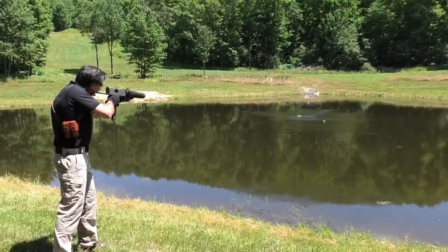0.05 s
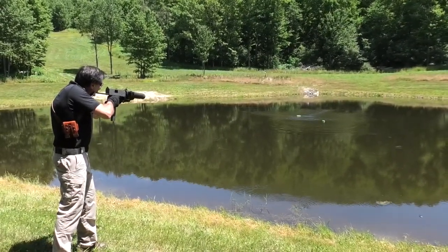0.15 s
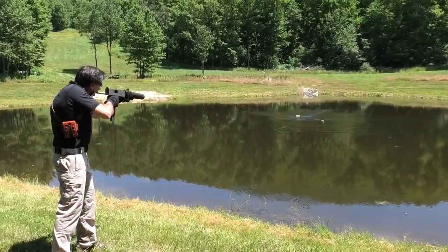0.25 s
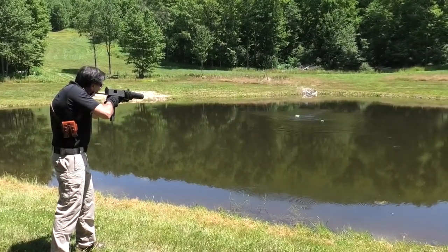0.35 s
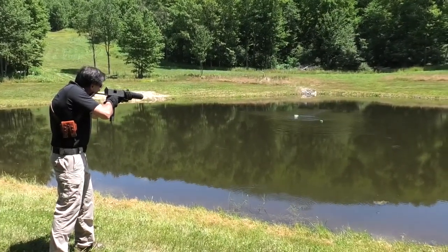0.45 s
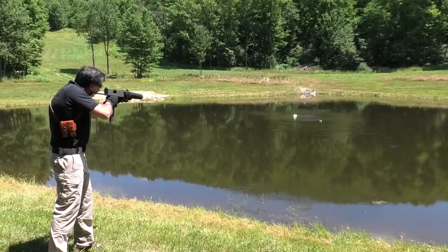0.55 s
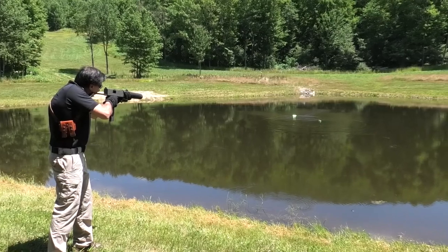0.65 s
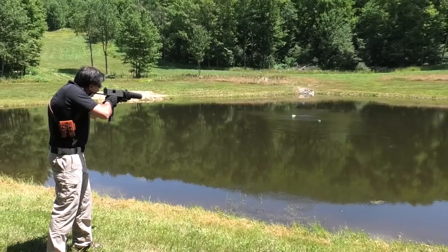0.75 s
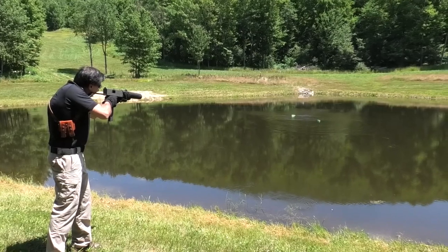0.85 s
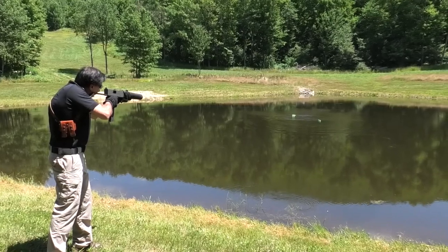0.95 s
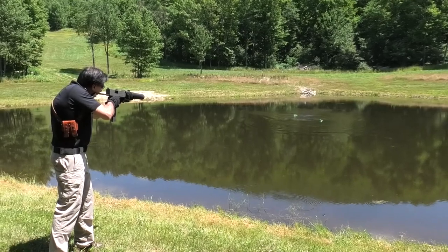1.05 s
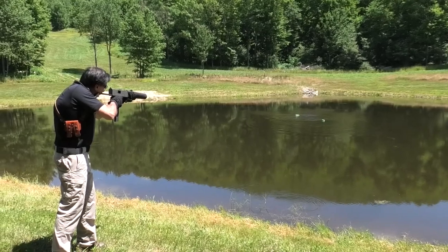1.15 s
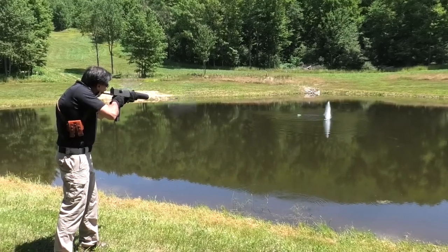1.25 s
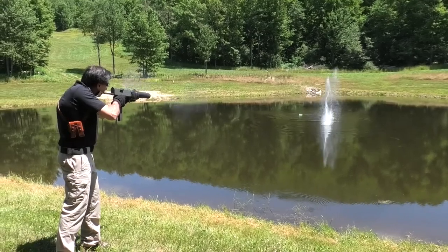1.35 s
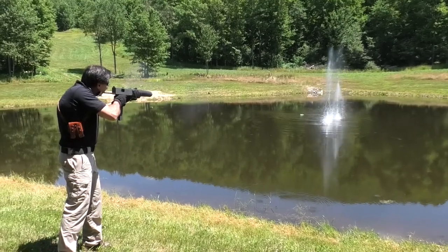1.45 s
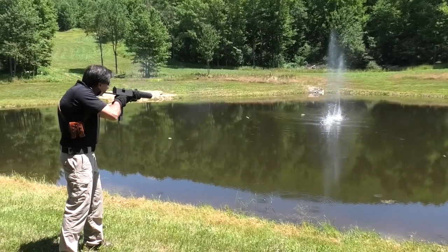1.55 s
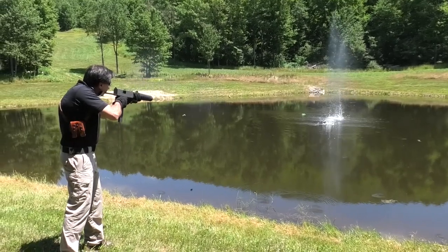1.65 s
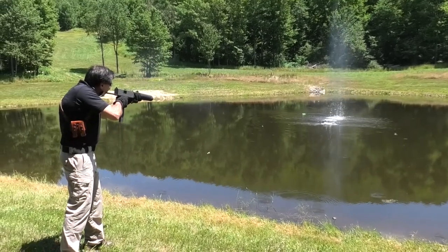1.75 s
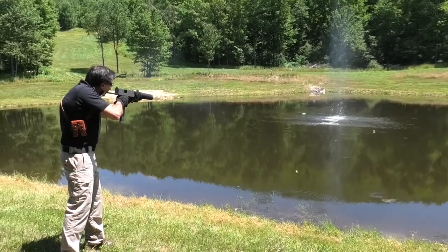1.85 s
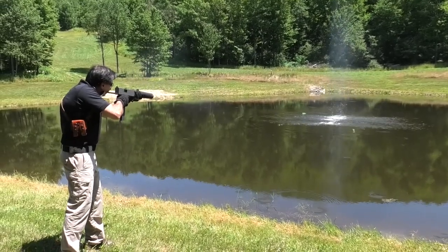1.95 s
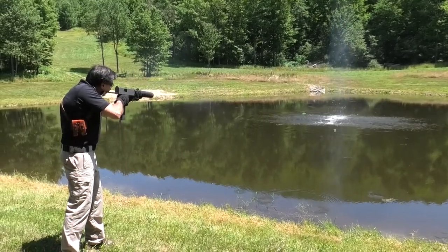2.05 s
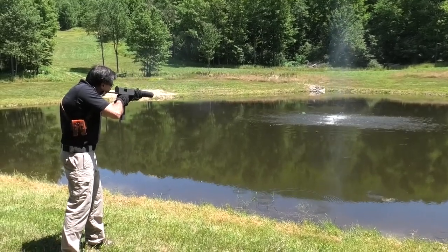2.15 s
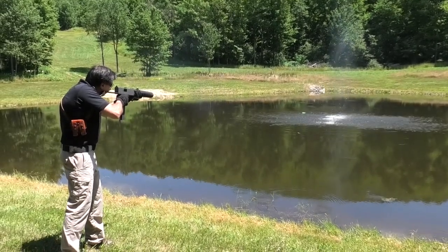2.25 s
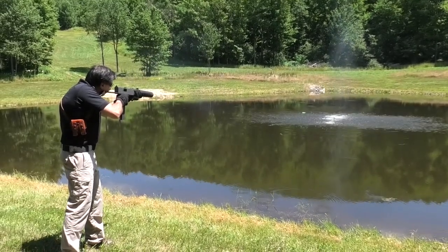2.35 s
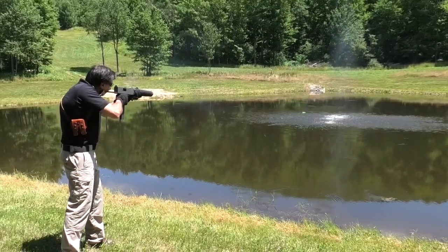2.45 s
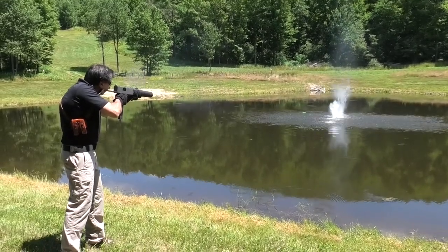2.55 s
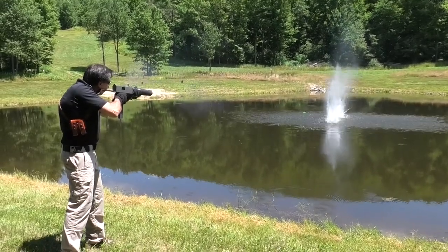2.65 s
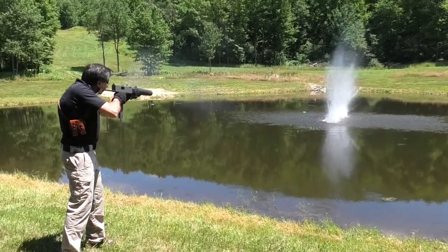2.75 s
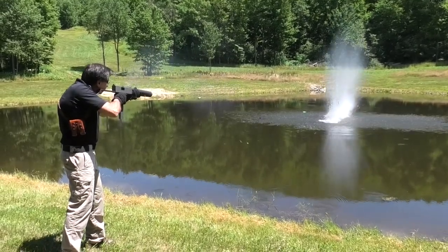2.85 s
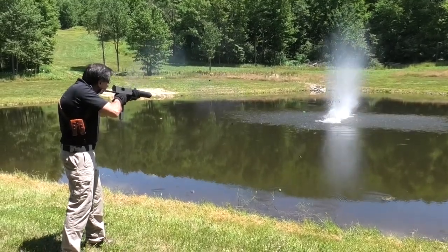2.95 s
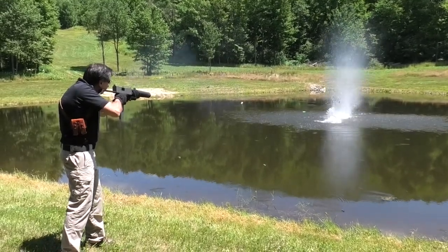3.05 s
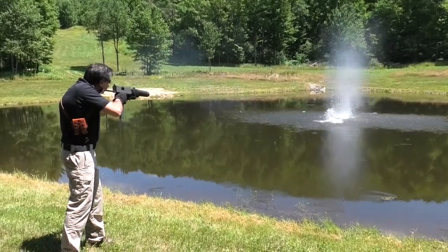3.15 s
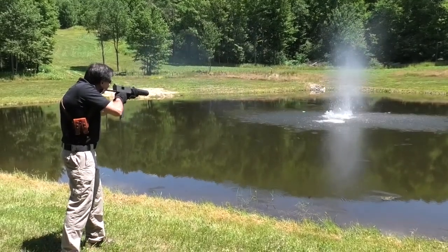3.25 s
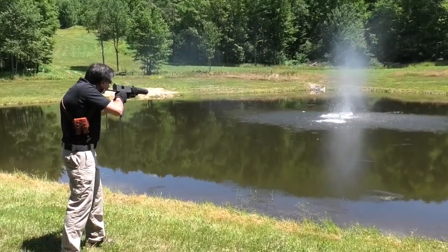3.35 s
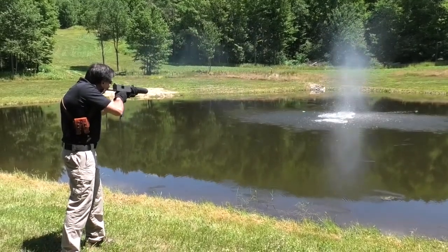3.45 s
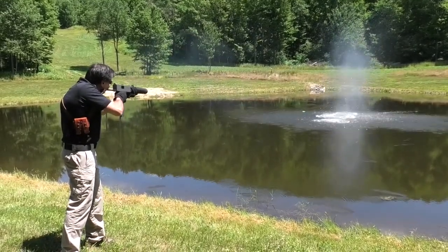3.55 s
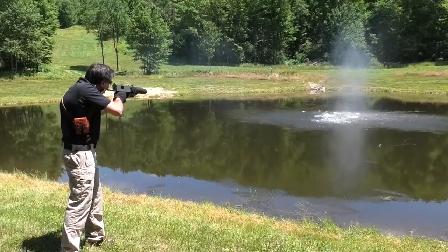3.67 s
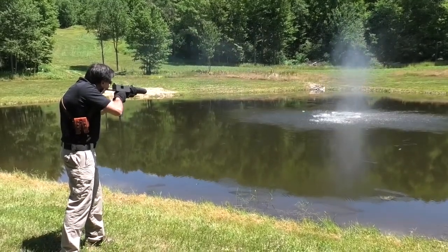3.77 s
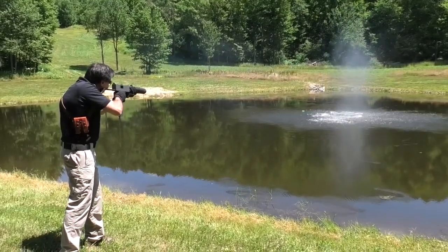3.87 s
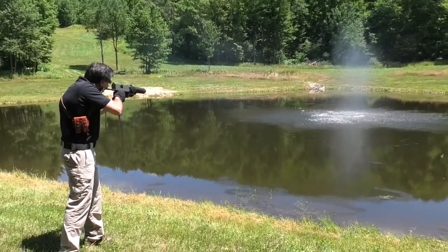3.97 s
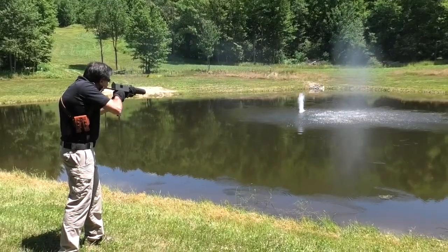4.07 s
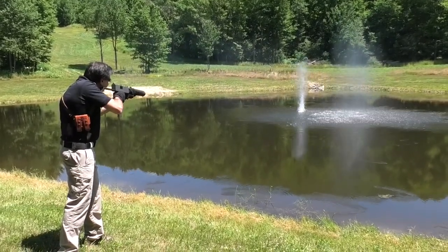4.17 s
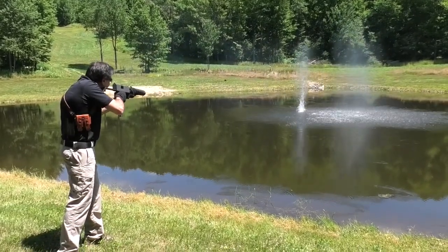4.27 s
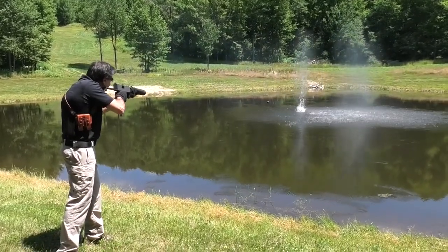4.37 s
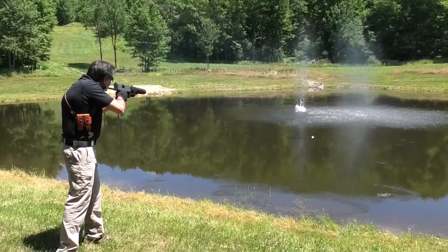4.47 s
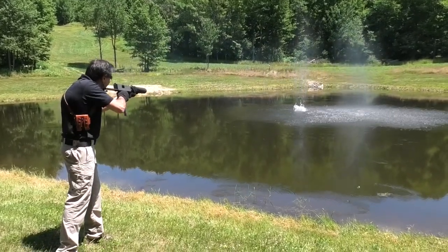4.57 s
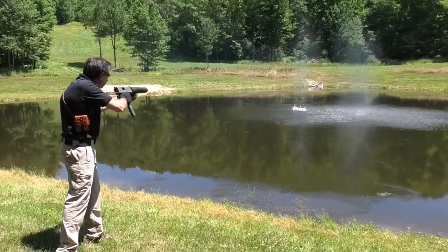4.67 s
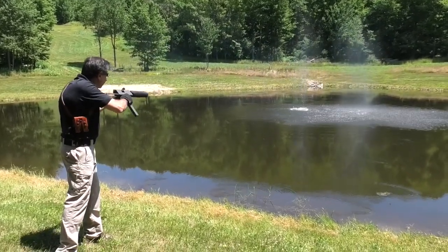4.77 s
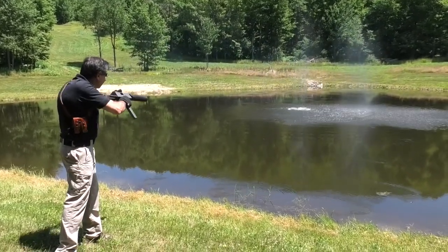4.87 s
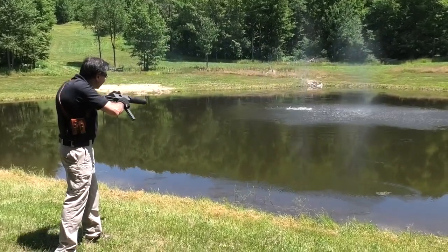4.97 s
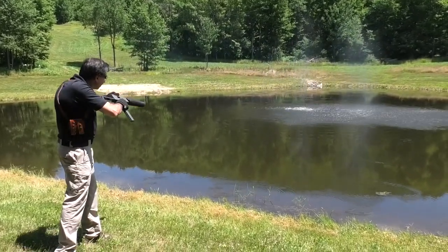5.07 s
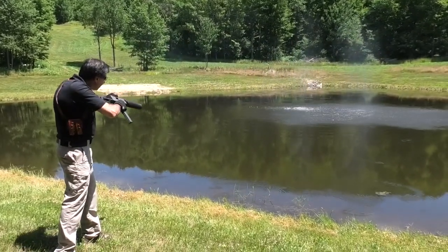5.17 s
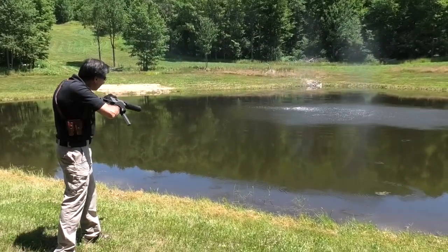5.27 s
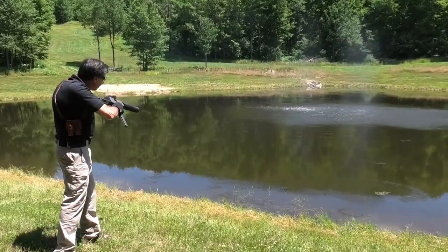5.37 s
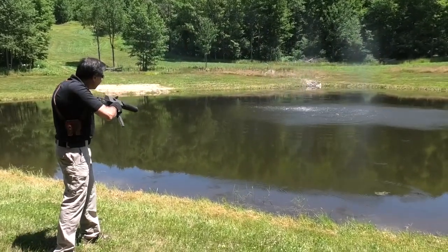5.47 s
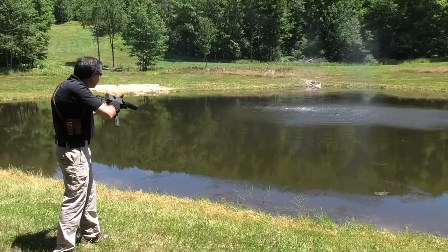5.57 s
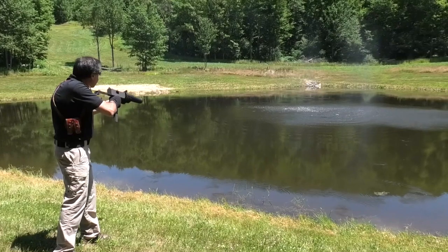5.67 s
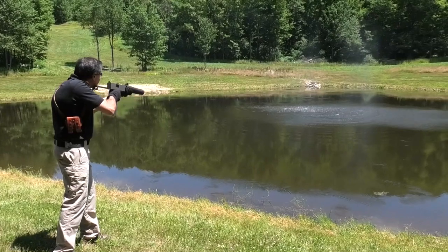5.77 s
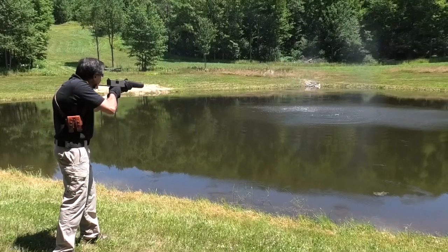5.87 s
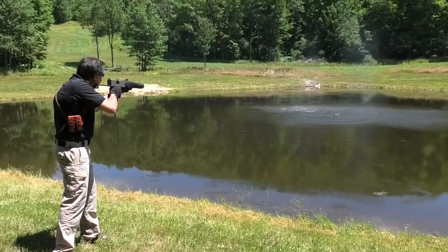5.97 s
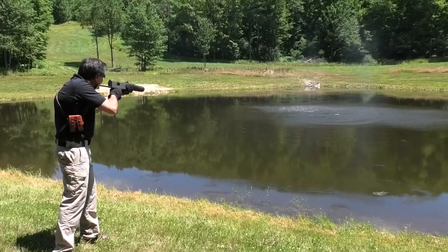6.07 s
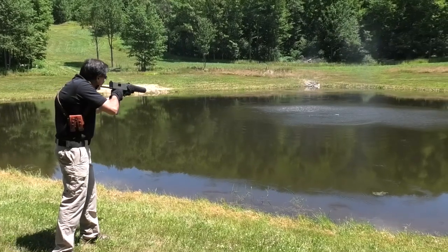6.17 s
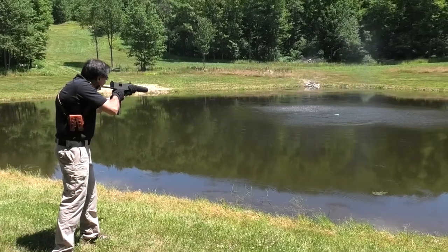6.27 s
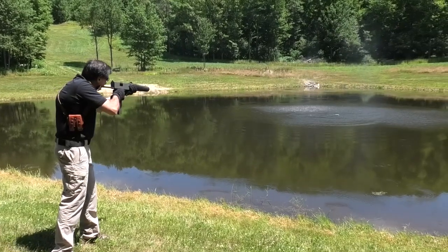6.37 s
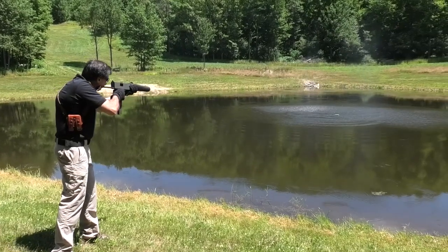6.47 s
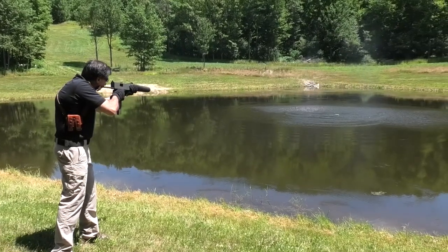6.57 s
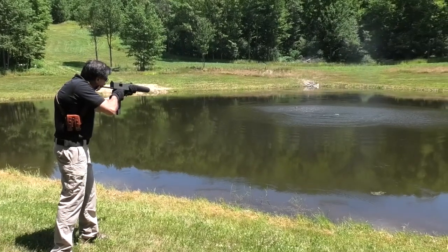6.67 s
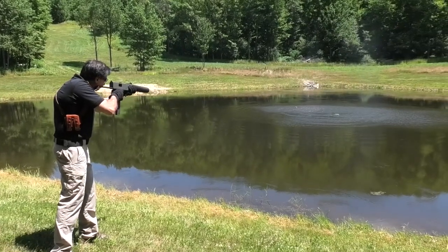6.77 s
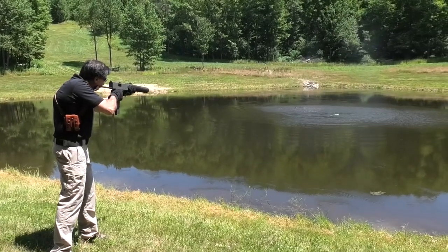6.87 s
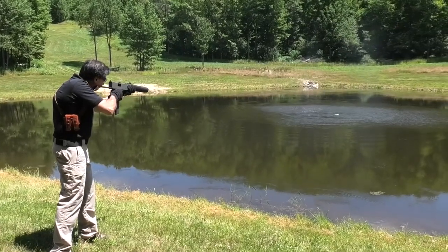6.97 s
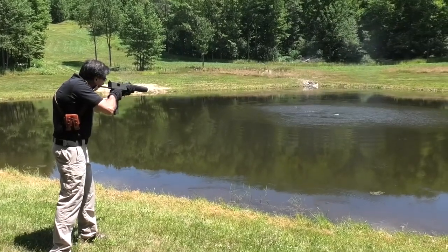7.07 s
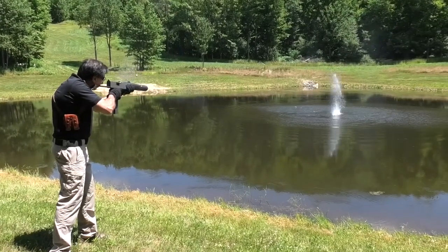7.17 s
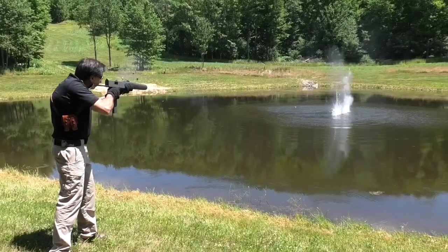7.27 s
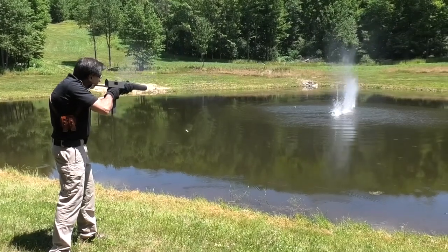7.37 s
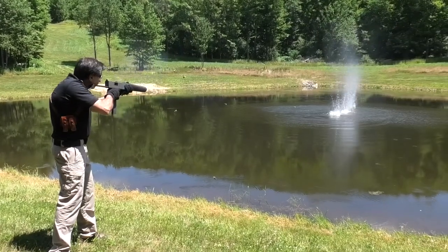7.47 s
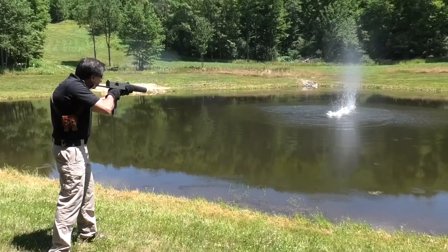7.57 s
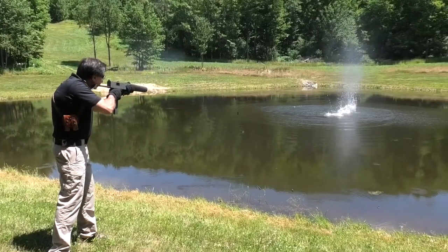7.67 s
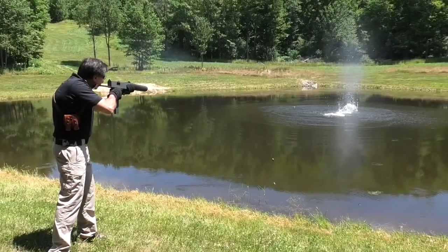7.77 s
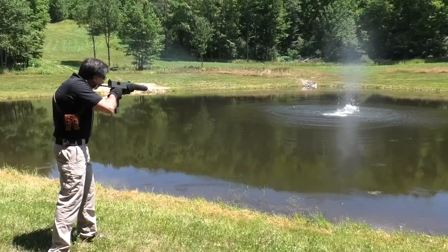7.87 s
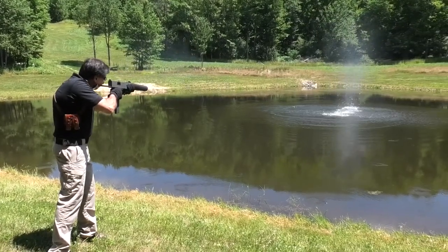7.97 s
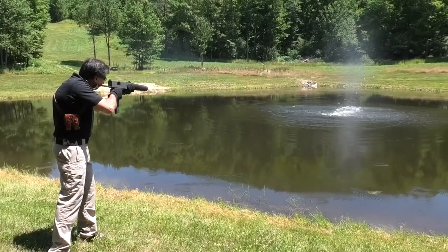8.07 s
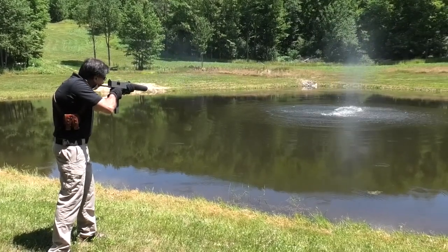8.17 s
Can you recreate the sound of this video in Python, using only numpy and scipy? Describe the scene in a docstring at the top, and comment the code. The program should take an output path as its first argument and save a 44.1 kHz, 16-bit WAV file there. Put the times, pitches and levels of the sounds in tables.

```python
"""Suppressed gun bursts into a pond

A suppressed submachine gun fires three bursts and a single shot into a pond in the woods.
The bolt rattles forward, each shot pops and hisses, and bullets thump into the water about 0.1 s later.
Decaying bands of noise make the long roar of the woods, which swells as an automatic gain recovers.
Gliding sines make the birds, rasping noise an insect, and ringing noise knocks the gun handling.
"""
import sys
import numpy as np
from scipy import signal
from scipy.fft import rfft, irfft, next_fast_len
from scipy.io import wavfile
from scipy.ndimage import uniform_filter1d

SR = 44100
rng = np.random.default_rng(int(sys.argv[2]) if len(sys.argv) > 2 else 0)


def waveform_to_disk(signal):
    """Save audio, clipped to [-1, 1], as 16-bit WAV at the path in sys.argv[1]."""
    frames = np.transpose(np.atleast_2d(signal))
    scaled = np.clip(frames, -1, 1) * 32767
    samples = np.round(scaled).astype(np.int16)
    wavfile.write(sys.argv[1], SR, samples)


N = 362502
T = np.arange(4096) / SR  # time axis of a short event
SIDES = np.array([[1], [-1]])  # left, right

# shots, one list per trigger pull: start_s, gas_level_db, pop_level_db
SHOTS = [
    [(1.2587, 0.5, -11.5), (1.3105, -12, -17.5), (1.3643, -12, -17.5), (1.4166, -11, -19.5)],
    [(2.5078, -5, -9.5), (2.5623, -10, -14.5), (2.6119, -11.5, -18.5), (2.6609, -12, -18.5),
     (2.7096, -11.5, -20), (2.7607, -10.5, -15.5), (2.81, -11, -16)],
    [(4.073, -4, -9.5)],
    [(7.1331, -7.5, -7), (7.1804, -11, -18), (7.228, -12, -22), (7.2772, -14, -17.5), (7.3246, -11, -20)],
]
# trigger pulls: bolt_db, near_echo_db, far_echo_db, near_tilt_db_per_band, far_tilt_db_per_band, bass_db
PULLS = [(0.55, -2.5, -8, 0.64, 0.83, 5), (0.34, -0.38, -2, 0.15, -1.2, -3.5),
         (0.62, -0.29, -0.5, 0.47, -0.8, 4), (0.1, 0.47, 0.5, 0.052, -1.76, 1.5)]


def undb(db):
    """Decibels to amplitude."""
    return 10 ** (np.asarray(db) / 20)


def along(table, hz):
    """Read (Hz, value) points on a log-frequency axis."""
    f, v = np.transpose(table)
    return np.interp(np.log(np.maximum(hz, 1)), np.log(f), v)


def coloured(size, table):
    """Noise of rms 1 with the given spectrum."""
    gain = undb(along(table, np.fft.rfftfreq(size, 1 / SR)))
    x = irfft(rfft(rng.standard_normal(size)) * gain, size)
    return x / x.std()


def band(x, hz, width):
    """One resonance, gain 1 at the centre, width at most 0.3 SR."""
    return signal.lfilter(*signal.iirpeak(hz, hz / min(width, .3 * SR), SR), x)


def fade(t, start, t60, rise=0.00066):
    """Quick rise at start, then an exponential fall."""
    u = np.maximum(t - start, 0)
    return (1 - np.exp(-u / rise)) * 1000. ** (-u / t60)


def walk(rate):
    """Random levels joined smoothly, rate a second; spread near 1."""
    x = np.arange(N) * (rate / SR)
    level, k = rng.standard_normal(int(x[-1]) + 2), x.astype(int)
    u = x - k
    smooth = u * u * (3 - 2 * u)
    return 1.15 * (level[k] + (level[k + 1] - level[k]) * smooth)


def add(out, s, x, pan_db):
    """Mix a sound in at time s; pan is left minus right."""
    i = int(s * SR)
    x = x[..., :N - i]
    out[:, i:i + x.shape[-1]] += x * undb(pan_db * SIDES / 2)


def follow(x, seconds):
    """Loudness that forgets over the given time."""
    keep = np.exp(-1 / (seconds * SR))
    return signal.lfilter([1 - keep], [1, -keep], np.abs(x).mean(axis=0))


def breeze():
    """Low noise, independent on the two capsules, whose level wanders slowly."""
    # spectrum: pitch_hz, level_db_per_hz
    breeze_colour = [(20, -5.5), (60, 4), (120, -23.5)]
    return np.array([undb(-67 + 2.1 * walk(1.5)) * coloured(N, breeze_colour) for _ in range(2)])


def hiss():
    """Treble noise of spray and cloth pricked by uneven ticks; each shot leaves hiss among the near trees."""
    # level of spray and cloth: time_s, level_db
    spray = [(0.0, -64), (0.6, -73), (1.5, -71), (2.17, -56), (2.5, -54), (3.5, -57), (4.03, -44.5),
             (4.45, -42), (4.71, -41.5), (5.04, -54.5), (5.2, -58), (5.34, -50), (5.42, -57.5),
             (5.56, -48.5), (5.84, -53), (6.43, -53.5), (6.62, -57.5), (6.85, -70), (7.7, -87),
             (8.22, -48.5)]
    # spectrum: pitch_hz, level_db_per_hz
    spray_colour = [(2350, -29.5), (4000, -2.5), (4990, -8), (6250, -3), (10400, -0.5), (15200, -11),
                    (16000, -9)]
    # ticks of falling drops and cloth: time_s, depth
    crackle_depth = [(1.8, .02), (2.1, 0.48), (2.45, 0.48), (2.9, 0.61), (3.5, 1), (4.4, 0.2), (4.799, 1),
                     (5.601, 0.91), (6.5, 0.99), (6.7, 0)]
    comb_hz, tick_s, ticks_per_s = 669, 0.00087, 150
    smoke_db, smoke_t60_s = -32.5, 1.17

    t = np.arange(N) / SR
    tick_level = undb(4.5 * np.minimum(rng.exponential(size=N), 2.5))
    ticks = tick_level * (rng.random(N) < ticks_per_s / SR)
    prickle = signal.lfilter([1], [1, -np.exp(-1 / (tick_s * SR))], ticks)

    mid, side = coloured(N, spray_colour), coloured(N, spray_colour)
    side = side + 1.5 * band(side, 13000, 5000)  # wider at the very top
    mid = mid + 0.3 * np.roll(mid, int(SR / comb_hz))  # heard again off the ground

    db, crackle = (np.interp(t, *np.transpose(c)) for c in (spray, crackle_depth))
    smoke = sum(fade(t, s, smoke_t60_s, rise=.02) ** 2 for shots in SHOTS for s, *_ in shots)
    level = np.sqrt(undb(db) ** 2 + undb(smoke_db) ** 2 * smoke)
    return level * (1 + np.abs(crackle) * prickle) * (mid + 0.2 * side * SIDES)


def birds():
    """Wavering sine glides, with a smear of noise echo that differs between the channels."""
    # whistles: start_s, length_s, first_hz, middle_hz, last_hz, level_db
    whistles = [(0.0, 0.029, 4700, 3930, 3850, -55), (0.045, 0.048, 3450, 2550, 2320, -55.5),
                (0.1, 0.045, 2650, 2960, 2970, -53), (.135, .027, 2930, 2410, 2310, -58),
                (.512, .014, 3750, 3900, 4000, -63), (.525, 0.02, 4500, 4150, 3600, -61),
                (0.543, 0.047, 3470, 3240, 3150, -55), (0.581, 0.04, 3200, 2750, 2280, -59),
                (0.616, .025, 2270, 2910, 3350, -56.5), (0.64, 0.038, 2900, 2740, 2650, -59),
                (1.107, 0.02, 4480, 4440, 4350, -63), (1.13, 0.022, 4500, 4800, 4800, -65),
                (1.177, 0.022, 3900, 4500, 4650, -54), (1.195, 0.02, 4660, 3830, 3330, -51),
                (5.715, 0.029, 3100, 3530, 3900, -51), (5.735, 0.055, 3900, 3420, 2880, -47),
                (6.252, .025, 1510, 1340, 1200, -50.5), (6.36, 0.053, 3630, 2860, 2080, -57),
                (6.42, 0.044, 2300, 3030, 3570, -51.5), (6.478, 0.025, 3600, 3210, 2820, -48.5),
                (6.755, 0.037, 1410, 1510, 1420, -58), (6.965, .035, 3520, 2950, 2700, -68.5),
                (7.015, 0.038, 3150, 3600, 4000, -62), (7.06, 0.04, 3680, 3130, 2710, -63.5)]
    # a far bird's quick falling note: length_s, first_hz, middle_hz, last_hz, level_db
    far_note = (.02, 5050, 4400, 3750, -70)
    far_start_s, far_every_s = .072, .1258
    echo_db, echo_t60_s = -37, .6

    t = np.arange(N) / SR
    song, waver, flutter = np.zeros(N), walk(90), walk(130)
    far = [(far_start_s + k * far_every_s, *far_note) for k in range(8)]
    for s, length, *hz, db in list(whistles) + far:
        on = slice(int(s * SR), int((s + length) * SR))
        u = (t[on] - s) / length
        edge = np.sin(np.pi * np.clip(u, 0, 1)) ** 0.4  # swells and fades
        glide = np.polyval(np.polyfit([0, .5, 1], hz, 2), u)
        phase = 2 * np.pi * np.cumsum(glide * (1 + .024 * waver[on])) / SR
        song[on] += np.sqrt(2) * edge * undb(db + 3.5 * flutter[on]) * np.sin(phase)

    tail = np.arange(12000) / SR
    out = []
    for _ in range(2):
        smear = rng.standard_normal(len(tail)) * fade(tail, .004, echo_t60_s)
        out.append(song + undb(echo_db) * signal.fftconvolve(song, smear)[:N])
    return np.array(out)


def insect():
    """Each chirp is a broad rasp of noise with a narrow, longer ring."""
    # chirps: start_s, level_db
    chirps = [(0.2907, -56), (0.651, -50), (1.005, -50.5)]
    out, t = np.zeros((2, N)), np.arange(12000) / SR
    for s, db in chirps:
        rasp = band(rng.standard_normal(len(t)), 10000, 2500) * fade(t, 0, 0.066)
        ring = band(rng.standard_normal(len(t)), 8350, 250) * fade(t, 0, 0.19)
        add(out, s, undb(db) * (rasp + undb(15.5) * ring), pan_db=2.0)
    return out


def echo_levels(t):
    """dB per band: every shot adds the power of an echo from the near trees and a later one from the far trees."""
    # the woods, a row per band: quiet_db, near_db, near_t60_s, far_db, far_rise_s, far_t60_s
    woods_bands = [(-56.5, -50, 4.2, -67, .05, 1.5), (-62, -44.5, 7.15, -35, 0.036, 0.53),
                   (-63, -34.5, 5.8, -32.5, 0.021, 3.7), (-67, -36.5, 4.58, -33, 0.024, 1.07),
                   (-73, -29.5, 1.994, -58.5, 0.044, 0.82)]
    # build-up of the near echo, one per band: rise_s
    near_rise = [.12, 0.11, 0.3, 0.33, 0.14]
    far_delay_s = 0.52

    quiet_db, near_db, near_t60, far_db, far_rise, far_t60 = np.transpose(woods_bands)[..., None]
    index = np.arange(len(woods_bands))[:, None]
    power, bass = undb(quiet_db) ** 2, index < 2  # the two lowest bands
    for shots, (_, near_gain_db, far_gain_db, near_tilt_db, far_tilt_db, bass_db) in zip(SHOTS, PULLS):
        near_level = undb(near_db + near_gain_db + near_tilt_db * index)
        far_level = undb(far_db + far_gain_db + far_tilt_db * index)
        for s, *_ in shots:
            near = near_level * fade(t, s, near_t60, np.abs(near_rise)[:, None])
            far = far_level * fade(t, s + far_delay_s, far_t60, far_rise)
            power = power + (near ** 2 + far ** 2) * undb(bass_db * bass) ** 2
    return 10 * np.log10(power)


def roar():
    """Half-octave bands of echo from the trees; they flutter together and flicker alone."""
    # band edges: low_hz, high_hz
    bands = [(50, 100), (100, 250), (400, 1000), (1500, 3000), (4500, 8000)]
    # spectrum: pitch_hz, level_db
    roar_colour = [(30, -21), (70, -11), (160, 0), (310, 2.5), (630, 0.5), (1100, 0.5), (2200, 3.5),
                   (4000, 0.5), (8000, -5), (15000, -55)]
    # likeness of the channels: pitch_hz, likeness (0-1)
    likeness = [(60, 0), (130, 0.9), (290, 0.8), (640, 0.7), (1410, 0.37), (3100, 0.39), (6820, 1),
                (15000, 1)]
    # balance: pitch_hz, left_minus_right_db
    balance = [(60, -0.5), (110, 2), (200, 0.5), (380, 0.5), (700, -3), (1290, -1), (2380, -1.5),
               (4400, -0.5), (8120, 0), (15000, -17.5)]
    grain_db = 1.5  # coarse grain, from single trunks

    t, size = np.arange(N) / SR, next_fast_len(N)
    s = t[::128]
    low, high = np.transpose(bands)
    per_hz = echo_levels(s) - 10 * np.log10(high - low)[:, None]
    log_centres = np.log(low * high) / 2
    f, out, flutter = np.fft.rfftfreq(size, 1 / SR), 0, walk(22)
    mid, side = rfft(rng.standard_normal((2, size))) * np.sqrt(SR / 2)
    for hz in 30 * 2 ** np.arange(0, 9.2, .5):
        octaves = np.log2(np.maximum(f, 1) / hz)
        mask = np.cos(np.pi / 2 * np.clip(2 * octaves, -1, 1))
        alike = np.clip(along(likeness, hz), 0, 1)
        pair = mid * np.sqrt(1 + alike) + side * np.sqrt(1 - alike) * SIDES
        weights = [np.interp(np.log(hz), log_centres, one) for one in np.eye(len(low))]
        db = sum(w * row for w, row in zip(weights, per_hz))
        db = np.interp(t, s, db) + along(roar_colour, hz) + .6 * flutter + .7 * walk(14)
        pan = along(balance, hz) * SIDES / 2
        out = out + irfft(pair * mask, size)[:, :N] * undb(db - 3.0) * undb(pan)
    grain = np.minimum(rng.exponential(size=N // 200 + 1), 4).repeat(200)[:N] - 1
    return out * undb(grain_db * uniform_filter1d(grain, size=100))


def treeline():
    """0.34-0.6 s after some shots, trees across the water return a grainy slap, bright or dull; knocks stand out."""
    # slaps: shot_s, delay_s, level_db, centre_hz, t60_s
    slaps = [(1.2587, .37, -29.5, 5400, 1.1), (2.5079, .47, -35, 6000, .9), (7.1331, .4, -38, 5000, 1.6),
             (1.2591, 0.52, -22, 2320, 1.23), (2.5075, .54, -38, 2480, .9),
             (2.7613, 0.59, -26.5, 700, 0.84), (4.0728, 0.34, -27, 4100, .55),
             (4.073, .525, -22.5, 1890, 0.87), (7.1327, 0.48, -29, 2400, 1.5), (7.3243, 0.5, -28, 600, .9)]
    # knocks: start_s, level_db, centre_hz
    knocks = [(1.812, -16, 1100), (1.917, -15, 600), (2.097, -18, 800), (3.469, -18, 800),
              (4.628, -16, 1297), (4.742, -17.5, 400), (4.785, -19, 800), (7.98, -16, 450)]
    out, t = np.zeros((2, N)), np.arange(24000) / SR
    for s, delay, db, hz, t60 in slaps:
        uneven = np.minimum(rng.exponential(size=len(t) // 240), 4.5) - 1.0
        trunks = undb(2.0 * uneven).repeat(240)  # near and far reflectors
        noise = rng.standard_normal((2, len(t))) + 1.96 * rng.standard_normal(len(t))
        slap = band(band(noise, hz, 2100), hz, 2450)
        add(out, s + delay, undb(db) * slap * trunks * fade(t, 0, t60, rise=0.0091), pan_db=-2.0)
    for s, db, hz in knocks:
        burst = rng.standard_normal(len(T)) * fade(T, 0, .03, rise=.001)
        knock = band(band(burst, hz, 2 * hz), hz, 2 * hz)
        add(out, s, undb(db) * knock / np.abs(knock).max(), pan_db=-2.5)
    return out


def click(db, t60, hz, width_hz):
    """A short knock that rings the steel, most around its own centre; the hollow stock hums on."""
    # receiver resonances: pitch_hz, quarter_width_hz, level_db
    resonances = [(1280, 50, 14.5), (4480, 16, -11), (5250, 42, -27), (5550, 83, -34), (6700, 77, -31),
                  (7340, 61, 19), (10000, 320, 12), (12900, 72, -20)]
    knock = rng.standard_normal(len(T)) * fade(T, 0, t60)
    steel = sum(undb(g) * band(knock, f, 4 * w) for f, w, g in resonances)
    x = band(band(undb(-10.5) * steel + knock, hz, width_hz), hz, 2 * width_hz)
    x = signal.sosfilt(signal.butter(3, 450, "high", fs=SR, output="sos"), x)
    hum = undb(-22) * np.sin(2 * np.pi * 930 * T) * fade(T, .002, .12)
    return undb(db) * (x / np.abs(x).max() + hum)


def handling():
    """Clicks of the gun in the hands, each a damped knock on steel."""
    # clicks: start_s, level_db, t60_s, centre_hz, width_hz, left_minus_right_db
    clicks = [(0.163, -35.5, 0.026, 8510, 12000, 2), (0.3097, -41, 0.016, 7000, 12000, 5),
              (5.215, -41, .012, 8000, 6000, 2), (5.249, -26.5, 0.013, 4500, 7000, 2),
              (5.2605, -40, 0.015, 5500, 8000, -1.0), (5.298, -32, .012, 2800, 2500, 1.5),
              (5.3081, -16, 0.028, 1900, 6000, 1), (5.313, -25.5, 0.058, 1820, 1500, 7),
              (5.333, -31, 0.017, 7500, 5000, 1.5), (5.383, -36, .015, 6000, 6000, 0),
              (5.421, -32, 0.015, 1280, 700, 1.0), (5.444, -6, 0.037, 1200, 5400, 3.5),
              (5.542, -33, .012, 2200, 2500, 1.5), (5.612, -41, .012, 7800, 4000, -2),
              (5.629, -44, .01, 9500, 4000, -3), (5.645, -41, .012, 10500, 3000, -1),
              (5.654, -32, .02, 7800, 900, -1), (5.6624, -30.5, 0.045, 2110, 2500, -1),
              (5.686, -39, .01, 10000, 3000, 0), (5.734, -28.5, 0.018, 2960, 8000, -2),
              (5.761, -34, .015, 5000, 5000, -1.5), (5.848, -40, .012, 3500, 2000, 1),
              (5.911, -40, 0.02, 2150, 1200, 0), (5.9546, -40, 0.02, 7670, 9000, -1.0),
              (5.995, -39, .015, 2200, 2500, 1), (6.086, -34.5, 0.03, 2300, 4000, 2),
              (6.194, -37, 0.027, 2200, 3500, -2), (6.32, -37, 0.033, 1550, 3700, -9),
              (6.377, -42, .03, 1500, 900, -1.5), (6.487, -33, 0.026, 3500, 6000, 2),
              (6.57, -27, 0.0089, 4180, 7900, -2), (6.84, -52, .02, 3300, 2480, -2),
              (8.17, -25.5, 0.024, 6420, 6000, -1), (8.212, -29, .03, 7000, 6000, -1)]
    out = np.zeros((2, N))
    for s, *knock, pan_db in clicks:
        add(out, s, click(*knock), pan_db)
    return out


def splash(thump_db, base_hz, rise, froth_db, froth_t60, crack_db, lead):
    """A hissing crack, then a frothing cavity opens: its pitch falls as it grows."""
    thump_fall_s, rumble_db, snap_db = 0.0035, -2, 4.5
    froth_over_thump = 3.2  # pitch ratio
    bubbles_s, bubble_octaves, bubble_cycles = .02, 1.8, 2.8  # break-off time, pitch range, ring

    u = np.maximum(T - lead, 0)
    hz = base_hz * (.9 + 2.5 * np.exp(-u / .0014))
    swell = (1 - np.exp(-u / rise)) * np.exp(-u / thump_fall_s)
    thump = np.sin(2 * np.pi * np.cumsum(hz * (u > 0)) / SR) * swell / swell.max()
    rumble = band(rng.standard_normal(len(T)), 260, 150) * fade(T, lead, .12, rise=.004)
    thump = thump + undb(rumble_db) * rumble  # low watery rumble outlasts the thump

    late, spread, size = rng.random((12, 3)).T[..., None]  # a dozen bubbles of unrelated sizes break off
    age = np.maximum(u - bubbles_s * late ** 2, 0)
    bubble_hz = base_hz * froth_over_thump * 2 ** (bubble_octaves * (spread - .4))
    bubbles = size * np.sin(2 * np.pi * bubble_hz * age) * np.exp(-age * bubble_hz / bubble_cycles)
    froth = bubbles.sum(axis=0) * fade(T, lead, froth_t60)

    sputter = undb(29.5 * uniform_filter1d(rng.standard_normal(len(T)), size=50))
    crack = band(band(rng.standard_normal(len(T)), 1900, 5500), 2500, 12000) * sputter
    tick = fade(T, 0, 0.043, rise=0.00049)
    snap = fade(T, max(lead - .002, 0), 0.021, rise=0.0015)  # as the cavity opens
    crack = crack * (tick + undb(snap_db) * snap)
    return undb(thump_db) * thump + undb(froth_db) * froth / np.abs(froth).max() + undb(crack_db) * crack


def pond():
    """Bullets strike the water; each crack leads its thump."""
    # hits: thump_s, thump_level_db, base_hz, rise_s, froth_db, froth_t60_s, crack_level_db, crack_lead_s
    hits = [(1.371, -21, 186, 0.0026, -28, .04, -18, 0.0083),
            (1.417, -17.5, 226, 0.0022, -30, 0.045, -24, .003),
            (1.459, -24.5, 169, 0.0034, -24, 0.067, -32.5, 0.0034),
            (1.527, -13.5, 188, 0.0051, -20, 0.06, -25.5, 0.01),
            (2.624, -21.5, 206, 0.002, -33, .04, -29, 0.0052),
            (2.67, -21, 210, 0.0019, -17.5, 0.048, -30, 0.0037),
            (2.762, -20, 198, 0.0038, -31, 0.043, -19.5, 0.0036),
            (2.819, -28, 200.5, .0026, -29, 0.045, -43, 0.0073),
            (2.873, -21, 272, .0026, -13, 0.059, -19.5, 0.014),
            (2.9188, -27.5, 278, .0026, -11, 0.095, -20.5, 0.0095),
            (4.189, -13, 215, 0.0055, -17, 0.075, -20.5, 0.00062),
            (7.239, -21, 219, 0.0027, -23, 0.038, -32, 0.0078),
            (7.285, -35, 246, .0026, -21, 0.035, -21.5, 0.0045),
            (7.343, -29.5, 250, .0026, -27, 0.064, -23.5, 0.0063),
            (7.3982, -18, 231, 0.00049, -11.5, 0.023, -21, 0.0078),
            (7.4522, -8.5, 196, 0.00038, -11.5, 0.036, -20.5, 0.014)]
    out = np.zeros((2, N))
    for s, *water, lead in hits:
        add(out, s - lead, splash(*water, lead), pan_db=-2.5)
    return out


def bolt(level_db, t60, scrape_colour):
    """The bolt scrapes forward: a decaying burst of coloured noise."""
    return undb(level_db) / 2 * coloured(len(T), scrape_colour) * fade(T, 0, t60, rise=0.001)


def shot(gas_db, pop_db, ping_db):
    """A crack and a millisecond of suction, gas jetting for a few ms, a ground echo, then the bolt hits home."""
    # gas spectrum: pitch_hz, level_db_per_hz
    gas_colour = [(470, -3), (800, -0.5), (2240, -6.5), (2870, -7.5), (4930, -9), (5580, -8.5), (7000, -8),
                  (12500, -6.5), (16000, -14.5)]
    return_db, gas_side_db = -18, -13
    pop_s = 0.00071  # the pop comes just after the first gas

    jet = fade(T, 0, .12, rise=.0013) / (1 + np.exp((T - .0075) / .0005))
    gusts = undb(20.0 * uniform_filter1d(rng.standard_normal(len(T)), size=30))
    clatter = undb(return_db - gas_db) * fade(T, 0.015, 0.042, rise=0.00028)
    clatter = clatter + undb(-26.0) * fade(T, 0.019, 0.0077)
    # the top of the gas hiss differs between the capsules
    wide = undb(gas_side_db) * band(rng.standard_normal(len(T)), 14000, 6000) * SIDES
    gas = (coloured(len(T), gas_colour) + wide) * (jet * gusts + clatter)

    # gas whistles at the ejection port
    ping_db = ping_db + 2.5 * rng.standard_normal()
    whistle = band(rng.standard_normal(len(T)), 5600 * (1 + .04 * rng.standard_normal()), 700)
    ring = undb(ping_db) * whistle * fade(T, 0.0046, 0.014, rise=0.0022)

    pop = -np.sin(2 * np.pi * 640 * (T - pop_s)) * fade(T, pop_s, 0.0061, rise=.0004)
    ground = band(np.roll(pop, int(0.00616 * SR)), 200, 230)  # duller; subtracted below
    rumble = band(rng.standard_normal(len(T)), 750, 630) * jet
    push = np.sin(2 * np.pi * 45 * T) * fade(T, 0.00038, 0.014, rise=0.0008)  # slow shove of the blast
    low = undb(11.5) * pop - undb(6) * ground + undb(-1.5) * rumble + undb(-3.0) * push
    return undb(gas_db) * (undb(-7.0) * gas + ring) + undb(pop_db) * low


def gun():
    """Every trigger pull: bolt scrapes ahead of the first shot, then the shots."""
    # bolt scrapes: before_shot_s, level_db, t60_s
    scrapes = [(0.0342, -8.5, 0.024), (0.021, -17, 0.13), (0.012, -7, 0.044)]
    # scrape spectrum: pitch_hz, level_db_per_hz
    scrape_colour = [(240, -56), (400, -36), (839, -7), (1010, -1), (2180, -3), (2970, -1.5), (4650, 0),
                     (6150, -6.5), (9610, 0), (16000, -16.5)]
    # whistle over the gas, one per trigger pull: level_db
    pings = [8.1, 12, 7, 14.3]
    pan_db = 2.5
    out = np.zeros((2, N))
    for shots, ping_db, (bolt_db, *_) in zip(SHOTS, pings, PULLS):
        for s, gas_db, pop_db in shots:
            add(out, s, shot(gas_db, pop_db, ping_db), pan_db)
        for lead, db, t60 in scrapes:
            add(out, shots[0][0] - lead, bolt(db + bolt_db, t60, scrape_colour), pan_db)
    return out


def early_scatter(near):
    """The two capsules hear slightly different early scatter from the ground and the shooter."""
    # spectrum: pitch_hz, level_db
    scatter_colour = [(40, -4), (150, 8), (600, 5), (4000, -1), (13000, -2.5)]
    t = T[:1500]
    return np.array([signal.fftconvolve(c, coloured(len(t), scatter_colour) * fade(t, .0002, .022))[:N]
                     for c in near])


def automatic_gain(near):
    """Loud hits turn the background down: a quick dip with a sharp knee and a slower recovery."""
    dip_db, dip_s, knee = -43, 0.083, 5.7
    slow_db, slow_s = -35, 0.24
    dip = (1 + (follow(near, dip_s) / undb(dip_db)) ** knee) ** (-1 / knee)
    return dip / (1 + follow(near, slow_s) / undb(slow_db))


def scene():
    """Gun, water and handling over the gain-ridden woods and hiss, with wildlife on top."""
    pond_hz, pond_share = 706.5, 0.15  # echoes arrive twice, once off the pond: band spacing, strength
    near = gun() + pond() + handling()
    woods = treeline() + roar()
    off_pond = np.roll(woods, int(SR / pond_hz), axis=1)
    woods = (woods + pond_share * off_pond) / np.hypot(1, pond_share)
    background = (woods + hiss() + breeze() / automatic_gain(near)) * automatic_gain(near)
    return near + undb(-27.5) * early_scatter(near) + background + birds() + insect()


def record(dry):
    """The converter clips the loudest peaks and cuts the top."""
    lowpass = signal.ellip(10, .2, 70, 15900, fs=SR, output="sos")
    return signal.sosfilt(lowpass, np.clip(dry, -1, 1))


dry = scene()
out = record(dry)
waveform_to_disk(out)
```